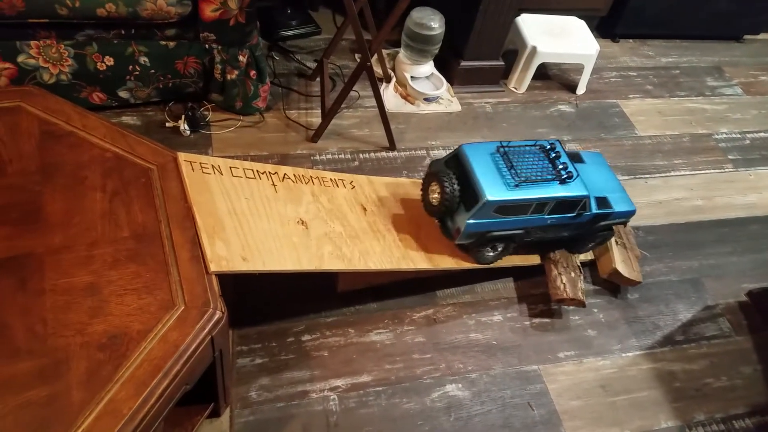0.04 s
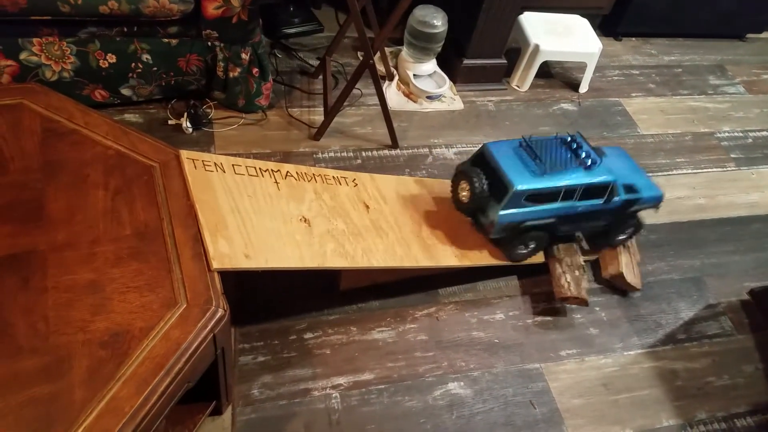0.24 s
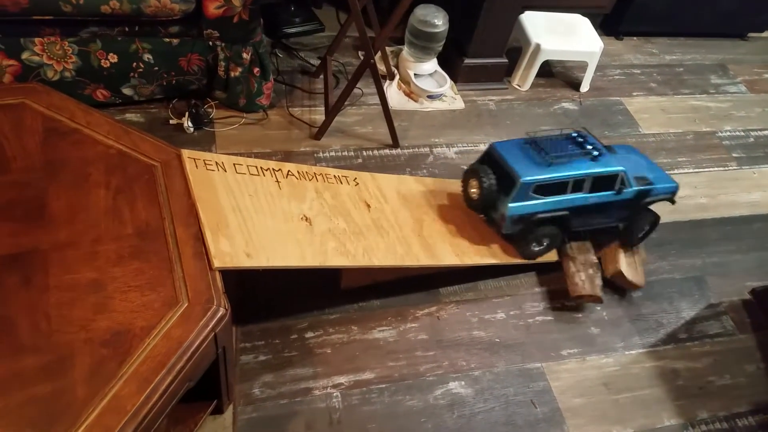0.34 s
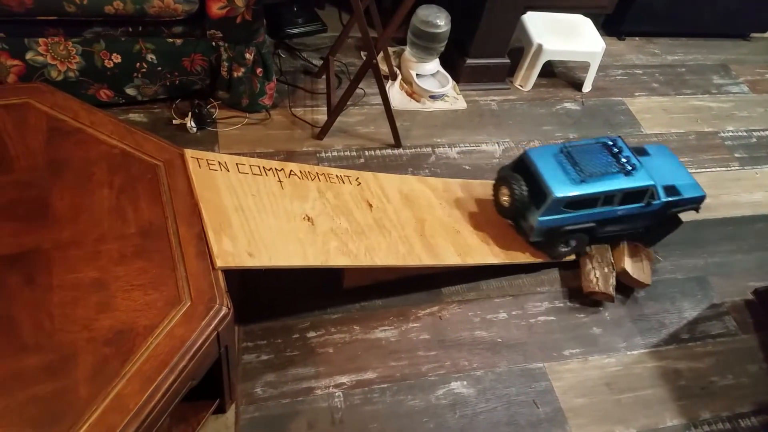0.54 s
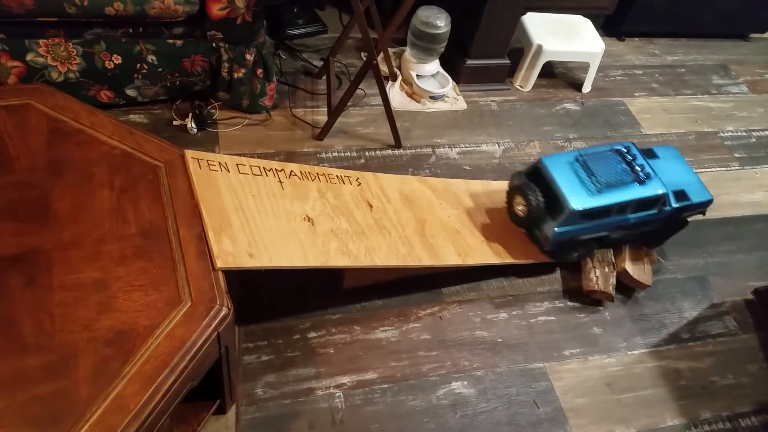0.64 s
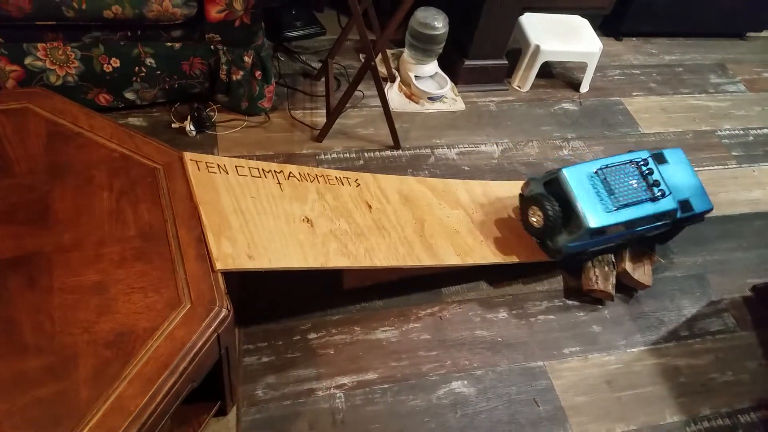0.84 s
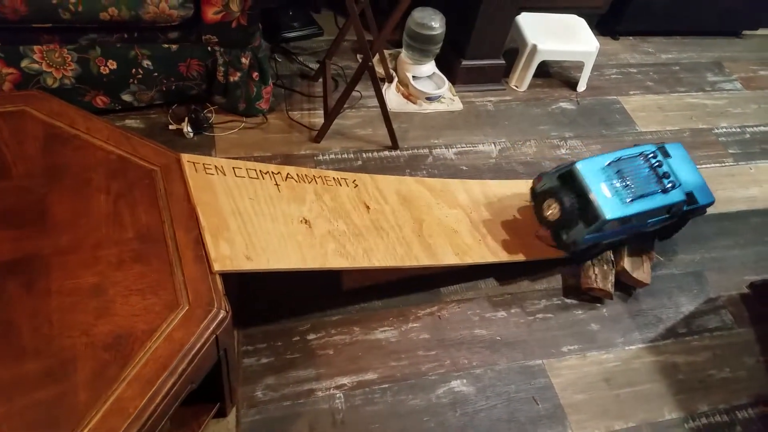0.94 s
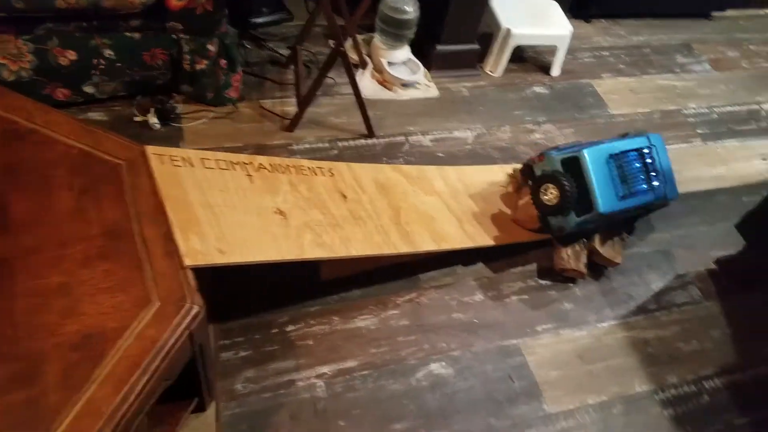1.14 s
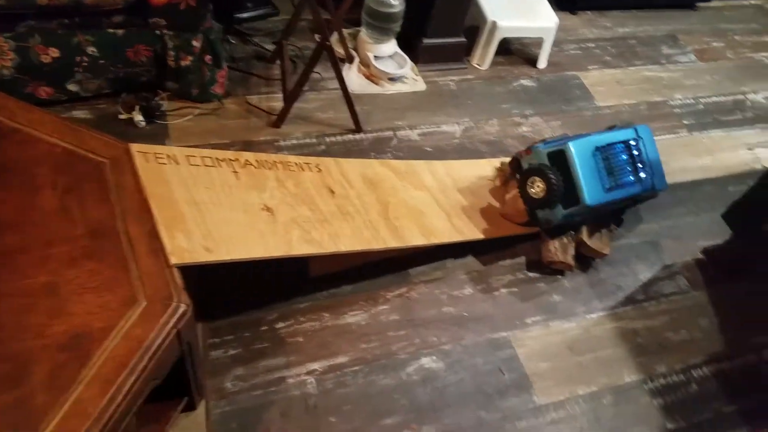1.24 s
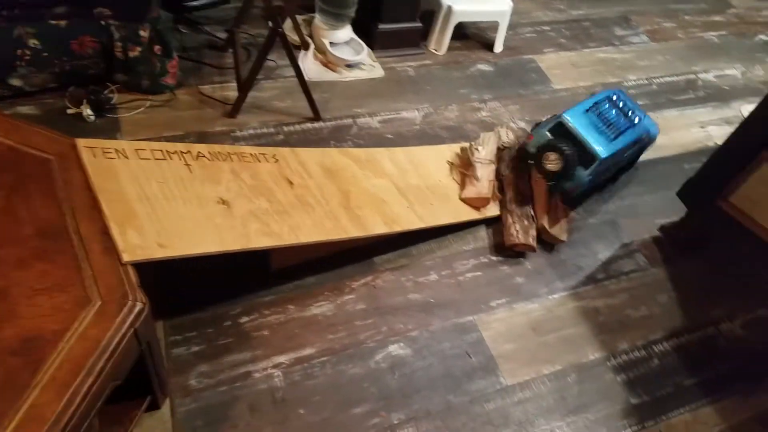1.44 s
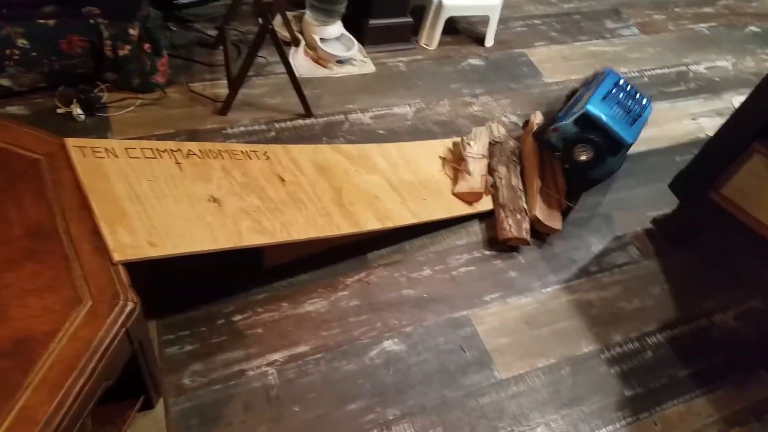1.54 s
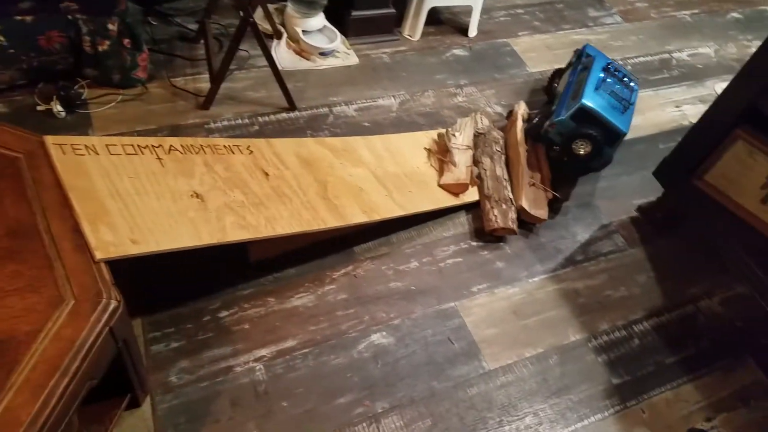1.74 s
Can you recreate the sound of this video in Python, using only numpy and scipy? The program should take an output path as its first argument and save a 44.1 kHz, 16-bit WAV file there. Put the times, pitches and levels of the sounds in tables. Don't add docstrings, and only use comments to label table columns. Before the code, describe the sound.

Toy crawler truck on wood: gear hiss first, a hard cluster of hollow knocks, a lull with faint steering buzz, then a motor burst with more thumps and scraping, close microphones, short indoor reverberation.

```python
import sys
import numpy as np
from scipy import signal
from scipy.fft import rfft, irfft, next_fast_len
from scipy.io import wavfile
from scipy.ndimage import map_coordinates

SR = 44100
rng = np.random.default_rng(int(sys.argv[2]) if len(sys.argv) > 2 else 0)


def gain_from_db(level_db):
    decades = np.asarray(level_db, float) / 20
    return 10 ** decades


def unload_wav(signal):
    wavfile.write(
        sys.argv[1],
        SR,
        np.round(np.clip(np.atleast_2d(signal).T, -1, 1) * 32767).astype(np.int16),
    )


N = 79380

# time_s, effort_db, strain_brightness_db
MOTOR_EFFORT = [(0, -37, 6), (.035, -41, 7), (.15, -38.5, 14), (.48, -37, 10), (.55, -45.5, 3),
                (.6, -63, 21), (.69, -53, 2), (.762, -35.5, 8), (.81, -39, 6), (.9, -58, 9),
                (1.02, -43.5, 10.5), (1.09, -54, 14.5), (1.155, -60, 9), (1.185, -43.5, 8),
                (1.21, -33.5, 13), (1.31, -32, 14), (1.6, -48, 10), (1.8, -40, 11)]
# frequency_hz, level_db (per hertz)
GEAR_HISS = [(290, 9), (500, 7), (1060, 4), (1810, 2), (3220, 2), (4830, 1), (8610, -16), (14300, -15),
             (15800, -18)]
# centre_hz, width_hz, lift_db
GEARBOX = [(4440, 1500, 4.5), (6930, 2000, 9.5), (8100, 1200, 6.5)]
# start_s, length_s, from_hz, to_hz, level_db
GEAR_WHINES = [(.008, .05, 5080, 5060, -47), (.07, .05, 4150, 4500, -47), (.122, .035, 4150, 4550, -47),
               (.155, .025, 6950, 6900, -47), (.215, .03, 8050, 8000, -47), (.716, .04, 850, 1220, -38),
               (.754, .03, 5970, 6020, -41), (.75, .018, 7200, 7250, -46), (.775, .014, 7400, 7450, -44),
               (1.192, .062, 4000, 5050, -38), (1.255, .03, 5200, 5600, -39),
               (1.285, .025, 5750, 6050, -41), (1.275, .022, 4700, 4850, -39), (1.21, .05, 6550, 6600, -45),
               (1.225, .085, 7050, 7350, -44), (1.3, .025, 5400, 5300, -42), (1.303, .016, 3700, 3900, -40),
               (1.318, .035, 4480, 4750, -41)]
# start_s, length_s, from_hz, to_hz, level_db
SERVO_BUZZES = [
    (.975, .04, 2620, 2760, -50),
    (1.005, .04, 2850, 3000, -53),
    (1.04, .03, 2850, 2780, -51),
    (1.045, .06, 2480, 2280, -52),
    (1.1, .03, 2780, 2760, -56),
]
# time_s, load_db, scrape_share_db
TYRE_LOAD = [(0.0, -48.5, 13.5), (0.18, -31.5, 8.5), (0.304, -29, 3.5), (0.36, -19, -23),
             (0.436, -35.5, 12), (0.576, -31.5, -4), (.7, -45, 9.5), (0.816, -44.5, 20), (.95, -41.5, 0.5),
             (1.04, -46, -10), (1.14, -69, -14), (1.258, -36, 10), (1.402, -27, 8), (1.498, -32, 7),
             (1.57, -34.5, 12.5), (1.612, -39.5, -3), (1.65, -32.5, 10.5), (1.8, -36, 2.5)]
# centre_hz, width_hz, level_db
BOARD = [(83, 18, 1.5), (148, 26, 2.5), (185, 60, -1.5), (262, 50, 0), (344.6, 52.5, -1), (448, 56, -2.5),
         (580, 36, -4.5)]
# centre_hz, width_hz, level_db
SHELL = [(693, 136, 1), (937, 133, 2.5), (1135, 145, 1), (1387, 97, 2), (1580, 360, -4.5),
         (2530, 570, -5.5), (2960, 540, -9), (3530, 450, -9.5), (4630, 1280, -28.5)]
# centre_hz, width_hz, level_db
ROOF_PANEL = [(1298.5, 25, 29.5)]
# start_s, peak_db, pitch_hz, length_cycles
THUMPS = [(0.13, -22, 207, 3.3), (.134, -29.5, 710, 11.3), (0.178, -22.5, 302, 2.4), (0.195, -21, 185, 1.7),
          (0.221, -33, 192, 1.2), (0.247, -20, 185, 3.3), (0.26, -14, 190, 1.84), (0.283, -21.5, 300, 2.5),
          (0.301, -16.5, 203, 2.8), (0.3123, -5.5, 247, 1.2), (.319, -4.5, 233, 3.7),
          (0.344, -8, 266, 4.43), (0.356, -17.5, 198, 2.7), (.37, -22, 262, 5.1), (0.393, -23, 247, 4.1),
          (0.425, -17.5, 135, 1.9), (.436, -19.5, 246, 3.2), (.49, -19, 212, 2.4), (0.575, -29, 409, 9.6),
          (0.809, -20, 300, 3.4), (0.83, -16, 425, 5.9), (0.854, -21.5, 446, 5.1), (0.88, -29.5, 394, 3.1),
          (0.928, -47, 380, 5), (.995, -35, 406, 9.5), (1.06, -41, 58, 1.9), (1.307, -19, 191, 2.5),
          (1.315, -11.5, 210, 3), (1.332, -13.5, 420, 2.8), (1.338, -16.5, 436, 6.1),
          (1.344, -14.5, 168, 1.47), (1.379, -10.5, 427, 3.95), (1.396, -24, 400, 2.1),
          (1.416, -22, 400, 2.3), (1.435, -27.5, 580, 7.7), (1.475, -31.5, 420, 9.8),
          (1.498, -28.5, 475, 5.9), (1.508, -26, 233, 3.9), (1.637, -35, 603, 9.4),
          (1.692, -22.5, 486, 3.6), (1.7, -26.5, 178, 2.55), (1.758, -31.5, 567, 11)]
# start_s, peak_db, pitch_hz
FLOOR_THUDS = [
    (0.194, -25.5, 79),
    (0.321, -27, 155),
    (0.331, -21.5, 83),
    (0.466, -21, 139),
    (0.82, -18.5, 167),
    (0.855, -29.5, 80),
    (1.409, -30.5, 84),
    (1.464, -31, 76),
]
# start_s, peak_db, crack_db, rattle_t60_s, hardness_db
CLACKS = [(0.1385, -22, -29, 0.069, 1.5), (0.262, -19.5, -11, 0.056, -5), (.3112, -22.5, -22, 0.043, -28.5),
          (.356, -26.5, -3, 0.072, -16), (.527, -21, -19, 0.049, -7.5), (0.6195, -26, -30, 0.079, -11.5),
          (0.8194, -18, -34, 0.15, 0), (1.3788, -22, -12, 0.015, -5), (1.5285, -18, -39, 0.1, 0.5),
          (1.627, -25, -4.5, 0.15, 12), (1.752, -24, -19, 0.23, 0)]
# frequency_hz, t60_s
ROOM_DECAY = [(100, 0.21), (500, 0.37), (3000, 0.26), (12000, 0.12)]
# frequency_hz, level_db
ROOM_LEVEL = [(300, -6.5), (2000, 1), (8000, 5)]
# frequency_hz, likeness (1 = identical)
PORT_LIKENESS = [(60, 1), (300, 0.86), (640, 0.66), (1400, 0), (4000, 0.013)]
# frequency_hz, level_db (per hertz)
ROOM_HUSH = [(15, -37), (25, 7), (184, 0.5), (1180, -12), (1280, -17), (1800, -18), (2600, -18),
             (15800, -43)]
# frequency_hz, difference_db
PORT_TILT = [(40, -2.5), (300, -0.75), (1500, 0.5), (5000, 3.5), (9000, 5), (13000, -4)]

LUGS_PER_S, LUG_SPREAD_DB, SCRAPE_DB = 190, 0.5, -11.5
THUMP_PEAK_AT = 0.38
THUMP_BOARD_DB, THUMP_SHELL_DB, THUD_CYCLES = -11.5, -24.5, 2.07
GEAR_BLUR, SERVO_BLUR = .014, .035
WHINE_FLUTTER_DB, WHINE_SWELL = 2.5, .6
CLACK_RISE_S, SHARP_DB = .0006, -16
SNAP_HZ, SNAP_WIDTH_HZ, SNAP_T60_S, CRACK_T60_S = 2300, 3000, .05, .016
NEAR_DB = -5
HUSH_DB, HUSH_SWAY_DB = -49, 1.5
PORT_LAG_S, MIC_LOW_HZ, MIC_TOP_HZ = .00012, 43, 15770


def unit(x):
    return x / np.sqrt(np.mean(x ** 2) + 1e-20)


def along(points, hz):
    f, v = np.transpose(points)
    return np.interp(np.log(hz + 1), np.log(f + 1), v)


def curves(rows):
    s, *cols = np.transpose(rows)
    return [np.interp(np.arange(N) / SR, s, c) for c in cols]


def wobble(rate):
    knots = rng.standard_normal(int(N * 200 / SR) + 4)
    return map_coordinates(knots, [np.arange(N) * rate / SR])


def filtered(x, response):
    m = next_fast_len(N + SR // 2)
    return irfft(rfft(x, m) * response(np.fft.rfftfreq(m, 1 / SR)), m)[..., :N]


def body(modes):
    def mode(f, k, c, w, db):
        return (-1) ** k * gain_from_db(db) * 1j * f * w / (c * c - f * f + 1j * f * w)
    return lambda f: sum(mode(f, k, *row) for k, row in enumerate(modes))


def grains(per_s, spread_db):
    chance, sign, size = rng.random((3, N))
    clicks = (chance < per_s / SR) * np.sign(sign - .5)
    return unit(clicks * gain_from_db(-spread_db * np.log(1 - size)))


def spread(pair):
    def balance(hz):
        turn = np.arccos(np.clip(along(PORT_LIKENESS, hz), -1, 1)) / 2
        return np.array([np.cos(turn), np.sin(turn)])
    mid, side = filtered(pair, balance)
    return np.array([mid + side, mid - side])


def drivetrain():
    effort_db, strain_db = curves(MOTOR_EFFORT)
    teeth = grains(5000, 4.0) + 1.1 * rng.standard_normal(N)

    def gearbox(hz):
        lift = sum(db / (1 + (2 * (hz - c) / w) ** 2) for c, w, db in GEARBOX)
        return gain_from_db(along(GEAR_HISS, hz) + lift)
    hiss = unit(filtered(teeth, gearbox))
    treble = filtered(hiss, lambda hz: 1 / (1 + (8800 / (hz + 1)) ** 12))
    level = gain_from_db(effort_db + 1.0 + 0.39 * wobble(40.7) + 1.7 * wobble(150))
    return level * (hiss + (gain_from_db(strain_db) - 1) * treble)


def whines():
    out = np.zeros(N)
    for blur, rows in ((GEAR_BLUR, GEAR_WHINES), (SERVO_BLUR, SERVO_BUZZES)):
        for s, length, from_hz, to_hz, db in rows:
            progress = np.clip((np.arange(N) / SR - s) / length, 0, 1)
            hz = from_hz + (to_hz - from_hz) * progress + blur * from_hz * wobble(190)
            level = gain_from_db(db + 8.0 + WHINE_FLUTTER_DB * wobble(89.0))
            swell = np.sin(np.pi * progress) ** WHINE_SWELL
            out += level * swell * np.sin(2 * np.pi * np.cumsum(hz) / SR)
    return out


def tyres():
    load_db, scrape_db = curves(TYRE_LOAD)
    drum = unit(filtered(grains(LUGS_PER_S, LUG_SPREAD_DB), body(BOARD)))
    scrape = unit(filtered(grains(1600, 2.6), body(SHELL)))
    return gain_from_db(load_db) * (drum + gain_from_db(SCRAPE_DB + scrape_db) * scrape)


def thumps():
    spot, blows, t = np.zeros(N + SR), np.zeros(N), np.arange(SR // 5) / SR
    skew = np.log(.5) / np.log(THUMP_PEAK_AT)
    for s, db, hz, cycles in [*THUMPS, *((*thud, THUD_CYCLES) for thud in FLOOR_THUDS)]:
        start = round(s * SR)
        progress = np.clip(t * hz / cycles, 0, 1) ** skew
        flex = np.sin(np.pi * progress) * np.sin(2 * np.pi * hz * t)
        spot[start:start + len(t)] += gain_from_db(db + 2.5) * flex
        blows[start] = gain_from_db(db) * rng.choice([-1, 1])
    spot = spot[:N]
    wood = gain_from_db(THUMP_BOARD_DB) * filtered(spot, body(BOARD))
    roof = filtered(blows, body(ROOF_PANEL))
    shell = gain_from_db(36 + THUMP_SHELL_DB) * filtered(blows, body(SHELL))
    return spot + wood + roof + shell


def clacks():
    layers, t = np.zeros((4, N + SR)), np.arange(SR // 4) / SR
    for s, db, crack_db, t60, hard_db in CLACKS:
        start = round(s * SR)
        noise = rng.standard_normal((4, len(t)))
        rise = 1 - np.exp(-t / CLACK_RISE_S * gain_from_db(2 * (db - SHARP_DB)))
        decay = gain_from_db(db - 60 * t / max(t60, .01))
        low, high = decay * rise * noise[:2] * gain_from_db([[-hard_db / 2], [hard_db / 2]])
        crack = gain_from_db(db + crack_db - 60 * t / CRACK_T60_S) * noise[2]
        snap = gain_from_db(db + hard_db / 2 - 60 * t / SNAP_T60_S) * rise * noise[3]
        layers[:, start:start + len(t)] += [low, high, crack, snap]
    low, high, crack, snap = layers[:, :N]
    shell = filtered(low, body(SHELL[:4])) + gain_from_db(2.0) * filtered(high, body(SHELL[4:]))
    snap = filtered(snap, body([(SNAP_HZ, SNAP_WIDTH_HZ, 4.5)]))
    crack = filtered(crack, lambda hz: 1j * hz / (4000 + 1j * hz))
    return gain_from_db(9.5) * shell + snap + crack


def room(x):
    out, hop = np.zeros((2, N + 2 * SR)), SR // 30
    for a in range(0, N, hop):
        hz, t, z = signal.stft(rng.standard_normal((2, SR // 2)), SR, nperseg=256)
        decay = gain_from_db(-60 * t / along(ROOM_DECAY, hz)[:, None])
        tail = signal.istft(z * decay, SR, nperseg=256)[1]
        wet = signal.fftconvolve(x[None, a:a + hop], tail / np.linalg.norm(tail[0]), axes=1)
        first = a + 200
        out[:, first:first + wet.shape[1]] += wet
    return filtered(spread(out[:, :N]), lambda hz: gain_from_db(along(ROOM_LEVEL, hz)))


def hush():
    noise = rng.standard_normal((2, N))
    air = spread(filtered(noise, lambda hz: gain_from_db(along(ROOM_HUSH, hz))))
    return gain_from_db(HUSH_DB + HUSH_SWAY_DB * wobble(7.3)) * unit(air)


def scene():
    near = whines() + clacks()
    rest = drivetrain() + tyres() + thumps()
    direct = filtered(near + rest, lambda hz: np.exp(np.outer([-1j, 1j], np.pi * hz * PORT_LAG_S)))
    return gain_from_db(-1.5) * (direct + room(rest + gain_from_db(NEAR_DB) * near)) + hush()


def top_cut(x):
    return signal.sosfilt(signal.butter(12, 16690, fs=SR, output="sos"), x)


def record(dry):
    def microphone(hz):
        colour = gain_from_db(np.outer([.5, -.5], along(PORT_TILT, hz)))
        return colour * (hz < MIC_TOP_HZ) / np.sqrt(1 + (MIC_LOW_HZ / (hz + 1)) ** 6)
    mix = filtered(dry, microphone)
    return top_cut(mix)


dry = scene()
out = record(dry)
unload_wav(out)
```